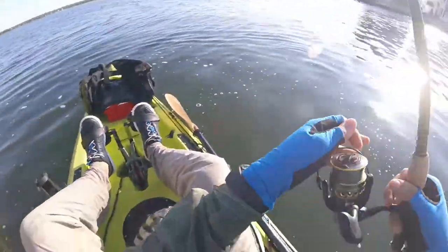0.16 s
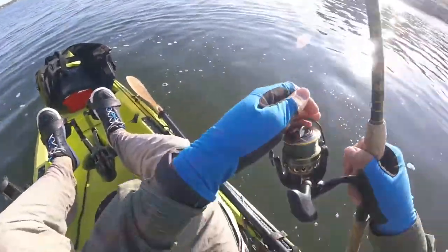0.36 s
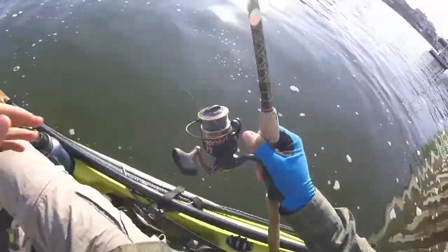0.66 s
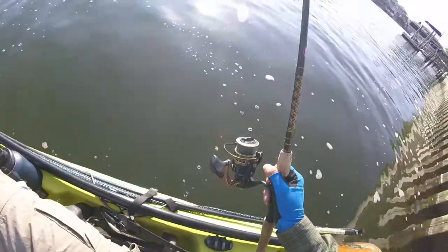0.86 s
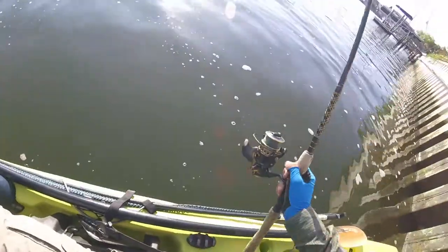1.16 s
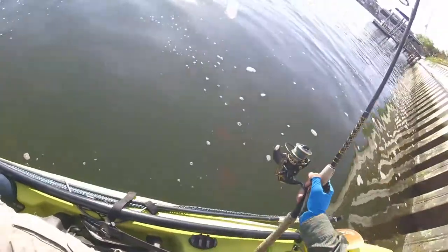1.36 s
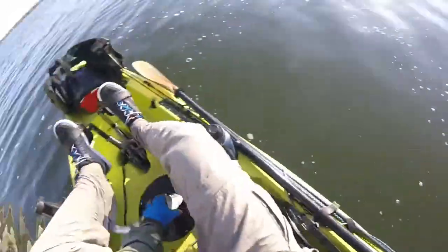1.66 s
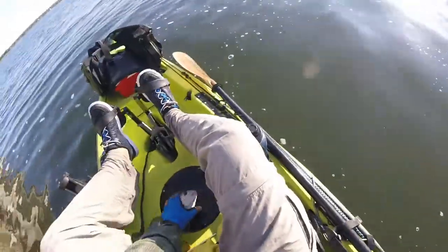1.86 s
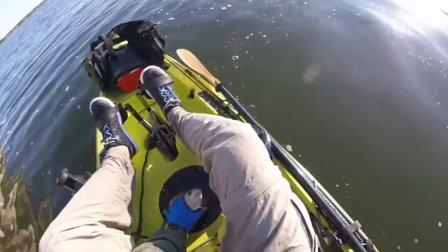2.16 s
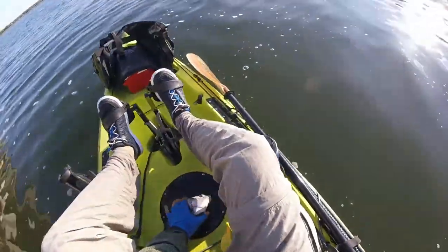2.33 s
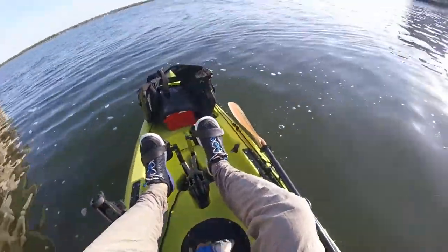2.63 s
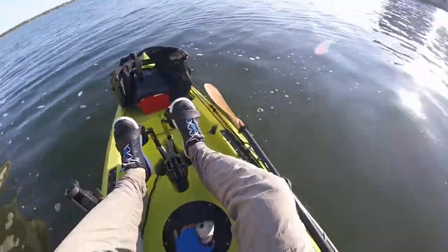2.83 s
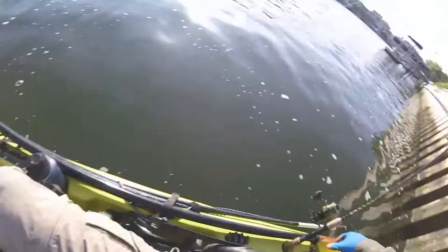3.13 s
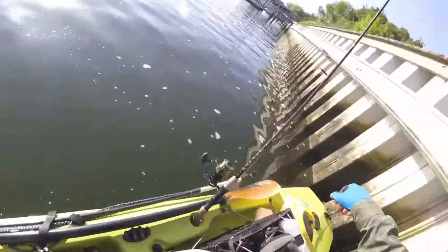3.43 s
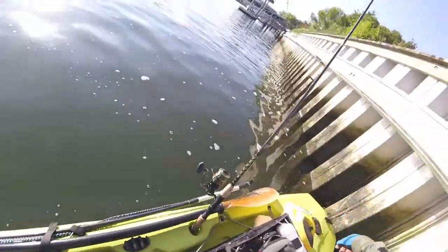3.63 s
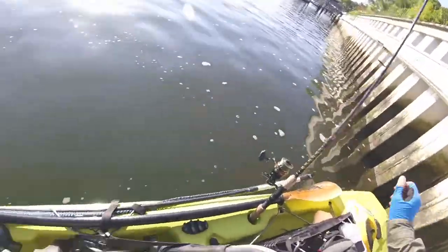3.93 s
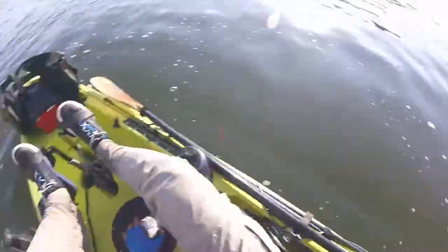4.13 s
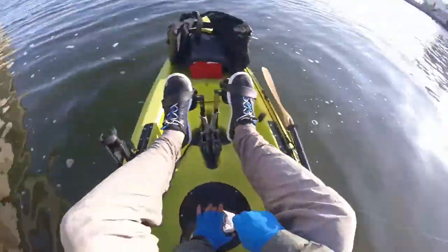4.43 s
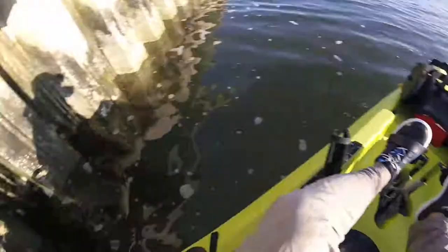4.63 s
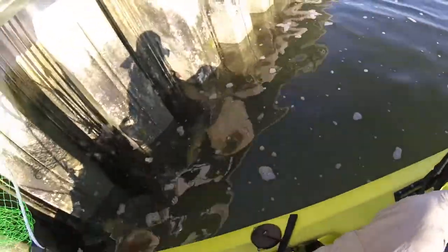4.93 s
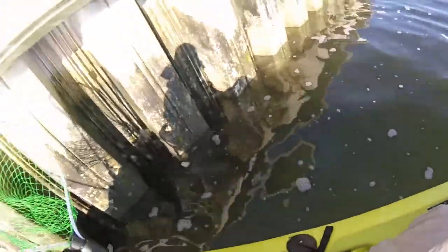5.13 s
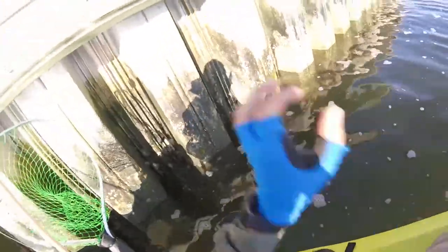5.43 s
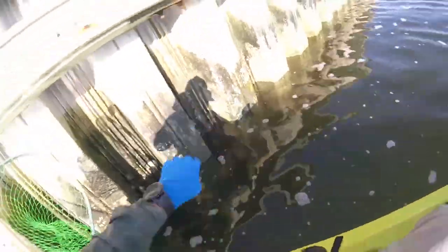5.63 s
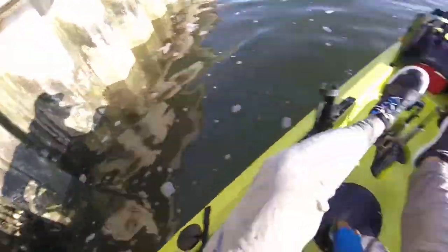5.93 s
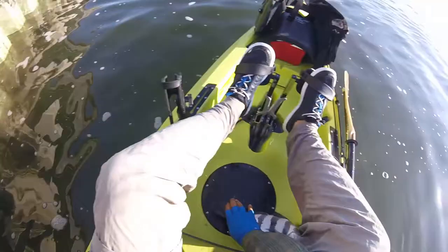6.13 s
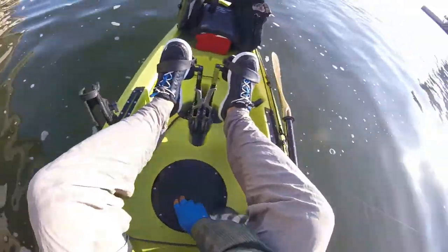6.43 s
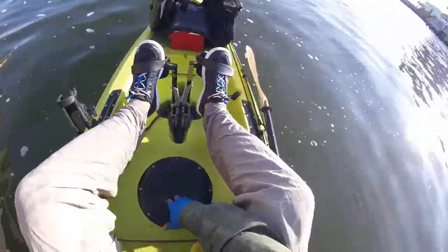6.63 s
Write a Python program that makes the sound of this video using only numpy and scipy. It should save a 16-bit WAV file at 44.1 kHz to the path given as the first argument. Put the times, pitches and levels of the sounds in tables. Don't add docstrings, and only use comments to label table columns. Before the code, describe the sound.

Close, boxy outdoor sound aboard a hollow plastic kayak. A ripple hisses, a reel bail clicks shut, then a fish beats the hatch about ten times a second, each low body thud answered by a wet tail smack. A lull brings soft housing knocks and a brief sleeve brush; heavier, more irregular flopping returns with wet drags, a faint seal groan and tiny metal tinkles. Light wind and distant chirps sit underneath.

```python
import sys
import numpy as np
from scipy import signal
from scipy.io import wavfile
from scipy.ndimage import uniform_filter1d, minimum_filter1d

SR = 44100
rng = np.random.default_rng(int(sys.argv[2]) if len(sys.argv) > 2 else 0)


def natural_amplitude(level_db):
    exponent = np.asarray(level_db, float) / 20
    return 10 ** exponent


def log_audio(samples):
    frames = np.atleast_2d(samples).T
    limited = np.clip(frames, -1, 1)
    pcm = np.round(limited * 32767).astype(np.int16)
    wavfile.write(sys.argv[1], SR, pcm)


N = 298998

# start [s], lid [dB], panels [dB], clap [dB].
FLANK = [(1.285, -35, -52, -59), (1.443, -31, -24, -56), (1.553, -16, -23, -36), (1.721, -14, -22, -50),
         (1.868, -23, -33, -53), (1.972, -16, -25, -31), (2.074, -13, -22, -32), (2.179, -18, -21, -33),
         (2.274, -14, -27, -33), (2.375, -13, -33, -29), (2.492, -17, -29, -39), (2.585, -19, -26, -23),
         (2.694, -16, -31, -39), (2.798, -16, -27, -32), (2.9505, -14, -28, -19), (3.065, -18, -36, -35),
         (3.241, -16, -18, -22), (3.4215, -15, -17, -28), (3.624, -20, -24, -44), (5.1365, -12, -17, -31),
         (5.323, -10, -15, -26), (5.468, -18, -24, -39), (5.6585, -13, -13, -24), (5.801, -18, -26, -44),
         (5.934, -25, -32, -51), (6.123, -36, -23, -53), (6.3505, -25, -18, -46), (6.4455, -25, -17, -32),
         (6.6385, -23, -20, -33)]
# start [s], lid [dB], panels [dB], clap [dB], spray [dB].
TAIL = [(0.863, -52, -34, -28, -45), (1.565, -26, -11, -21, -23), (1.772, -14, -8, -22, -25),
        (1.796, -18, -17, -30, -41), (1.9045, -21, -17, -4, -14), (2.0, -19, -21, -21, -23),
        (2.099, -15, -13, -16, -20), (2.198, -21, -11, -22, -22), (2.295, -18, -14, -20, -23),
        (2.3895, -18, -10, -13, -19), (2.509, -19, -17, -24, -33), (2.604, -11, -10, -31, -36),
        (2.7035, -7, -14, -15, -25), (2.809, -12, -14, -22, -32), (2.963, -5, -18, -13, -27),
        (3.085, -14, -11, -21, -24), (3.435, -27, -11, -16, -26), (3.6475, -34, -31, -42, -66),
        (5.162, -21, -16, -33, -35), (5.3525, -34, -15, -14, -28), (5.507, -14, -16, -17, -21),
        (5.8125, -17, -22, -28, -43), (6.1535, -20, -11, -45, -62), (6.464, -21, -33, -41, -42)]
# start [s], lid [dB], panels [dB].
REBOUNDS = [(0.8, -48, -64), (1.61, -40, -30), (2.134, -42, -29), (2.415, -32, -29), (2.651, -18, -31),
            (2.751, -38, -26), (2.852, -30, -34), (3.121, -38, -29), (3.281, -26, -38), (3.517, -39, -40),
            (3.673, -38, -34), (4.817, -47, -37), (4.958, -48, -42), (5.09, -56, -25), (5.188, -28, -37),
            (5.278, -50, -33), (5.564, -30, -34), (5.709, -32, -26), (5.779, -36, -38), (5.859, -37, -29),
            (5.955, -37, -37), (6.036, -37, -30), (6.064, -38, -29), (6.135, -28, -18), (6.228, -28, -41),
            (6.386, -35, -35), (6.663, -28, -23), (6.708, -40, -40)]
# start [s], clap [dB], spray
# [dB].
TICKS = [(0.4679, -48, -39), (0.502, -57, -40), (1.661, -34, -40), (1.6755, -38, -42), (1.6868, -33, -30),
         (2.116, -23, -34), (2.2057, -17, -20), (2.5436, -20, -27), (2.5942, -25, -33), (2.7752, -21, -22),
         (2.83, -34, -46), (3.03, -44, -52), (3.3543, -28, -39), (3.5296, -44, -49), (3.9278, -44, -54),
         (4.402, -50, -52), (4.5944, -44, -49), (4.6056, -49, -48), (5.0608, -35, -41), (5.4963, -20, -28),
         (5.5671, -27, -39), (5.9455, -38, -36), (6.0417, -43, -29), (6.1164, -36, -33), (6.5112, -24, -41),
         (6.5292, -47, -38), (6.6106, -29, -29), (6.689, -46, -43), (1.5545, -30, -38), (1.785, -30, -34),
         (1.845, -36, -38), (1.923, -36, -38), (2.0717, -40, -36), (2.2747, -40, -35), (2.375, -38, -33),
         (2.4912, -38, -33), (2.571, -40, -42), (3.0649, -42, -36), (3.7244, -62, -61), (3.795, -52, -62),
         (4.19, -62, -62), (4.635, -52, -56), (5.3193, -40, -40), (5.343, -40, -34), (5.4669, -45, -37),
         (5.7473, -52, -54), (5.7997, -40, -42), (5.8635, -50, -46), (5.9389, -42, -38), (6.2142, -52, -53),
         (6.31, -52, -55), (6.3514, -45, -42), (6.4183, -52, -50), (6.4462, -40, -36), (6.49, -42, -48),
         (6.6398, -44, -41)]
# start [s], clap [dB], spray [dB].
SMEARS = [(0.992, -57, -72), (1.6014, -43, -43), (1.7152, -40, -38), (1.8339, -35, -38), (1.8931, -34, -34),
          (1.9404, -41, -36), (2.628, -26, -45), (2.7513, -44, -44), (2.8999, -45, -45), (3.1148, -42, -41),
          (3.455, -37, -54), (3.6722, -44, -77), (3.695, -65, -58), (3.936, -56, -57), (4.6184, -49, -57),
          (4.693, -55, -61), (4.8, -50, -70), (4.8227, -47, -62), (4.956, -41, -55), (5.1919, -39, -46),
          (5.259, -33, -47), (5.2845, -28, -37), (5.3916, -38, -42), (5.8373, -40, -59), (6.0634, -49, -47),
          (2.995, -38, -50), (3.21, -46, -66), (3.3154, -47, -57), (3.548, -47, -66), (5.1167, -52, -56),
          (5.215, -42, -48), (6.72, -50, -55)]
# time [s], lid pitch [Hz], hull share [dB].
GRIP = [(0, 166, -12), (1.5, 138, -12), (2.5, 138, -8), (2.7, 145, -19), (3.1, 160.7, -6), (3.6, 161, -13),
        (5, 143.7, -7), (5.9, 136.8, -1), (6.22, 140, -21), (6.78, 153, -2)]
# frequency [Hz], level [dB], T60 [s].
PANEL_MODES = [(230, -1.5, 0.079), (285, -1, 0.077), (339.5, -3, 0.083), (430.8, -4, .08),
               (508.9, -5, 0.08), (647.5, -9, .07), (788, -13.5, 0.062), (935, -13, 0.059),
               (1180, -17, 0.045)]
# frequency [Hz], level [dB].
CLAP_COLOUR = [(300, -38), (600, 4), (1000, 3.5), (1500, -1.5), (2100, -3.5), (2800, -10), (4000, -45),
               (9000, -85)]
# frequency [Hz], level [dB].
SPRAY_COLOUR = [(1500, -41), (2600, -1), (4000, 2), (4800, -6), (6300, -7), (8000, -13), (10000, -25),
                (12000, -26), (14900, -52)]
# start [s], level [dB],
# frequency [Hz], T60 [s].
POPS = [(.864, -38, 1900, .02), (1.566, -24, 1000, .04), (1.905, -20, 2050, .015), (2.39, -24, 3750, .025),
        (2.39, -26, 1580, .03), (2.544, -33, 1100, .04), (2.704, -22, 720, .04), (2.773, -26, 3050, .025),
        (2.81, -28, 1550, .03), (2.962, -20, 720, .045), (3.086, -24, 600, .05), (3.435, -28, 2000, .03),
        (3.53, -44, 2900, .03), (5.354, -26, 1150, .04), (5.507, -26, 2200, .02), (5.507, -28, 3750, .025),
        (5.567, -34, 1400, .04), (5.612, -54, 2094, .2), (5.657, -14, 930, .028), (5.69, -33, 465, .25),
        (5.812, -28, 1100, .05), (6.042, -38, 3900, .018), (6.042, -40, 2750, .018), (6.06, -38, 581, .3),
        (6.117, -34, 4250, .014), (6.512, -36, 1950, .03), (6.512, -36, 1000, .03), (6.69, -48, 4000, .025),
        (5.392, -43, 1217, .5), (5.39, -50, 4740, .12), (3.11, -50, 4740, .08), (1.443, -20, 1180, .045),
        (1.45, -29, 940, .07), (5.985, -52, 2600, .1), (1.774, -17, 370, .06), (1.567, -19, 300, .05),
        (.864, -32, 430, .06), (5.36, -24, 520, .12), (6.465, -46, 3400, .03), (2.6, -26, 1750, .03)]
# frequency [Hz], T60 [s].
HOLLOW_DECAY = [(50, 0.27), (130, 0.22), (350, 0.22), (920, 0.19), (2400, 0.068), (6400, 0.078),
                (14000, 0.039)]
# frequency [Hz], level [dB].
RIM_COLOUR = [(150, -20), (350, -3), (600, 0), (1000, -3), (1600, -10), (2600, -20), (5000, -36),
              (9000, -60)]
# frequency [Hz], level [dB], T60 [s].
HOOK_MODES = [(1217, -3, .39), (2356, 0, .5), (3110, -10, .5), (3610, -19, .2), (4740, -14, .15)]
# frequency [Hz], level [dB], T60 [s].
SNAP_MODES = [(1580, 0, .3), (2885, 0, .35), (3880, -5, .35), (4060, -7, .3)]
# start [s], level [dB], time until damped [s], snap link [dB], swivel [dB].
SHAKES = [(1.47, -66, .05, -6, -12), (2.409, -50, .07, -12, -12), (2.75, -40, .085, -18, 1),
          (3.114, -54, .09, 3, -6), (3.47, -64, 0.089, -4, -9), (5.39, -38, 0.11, -19, -12),
          (5.61, -66, .045, 6, -3), (5.75, -60, .04, -10, -9), (6.064, -54, 0.055, 1, -6),
          (2.374, -55, .02, -9, 19), (6.528, -62, .015, -9, 20), (6.485, -62, .03, -9, 12)]
# frequency [Hz], level [dB], T60 [s].
BAIL_MODES = [(2110, 0, .008), (3000, -4, .006), (4150, -2, .007), (5450, -6, .007), (6300, -7, .008),
              (7900, -13, .005), (11500, -10, .0018)]
# frequency [Hz], level [dB], T60 [s].
BUTT_MODES = [(940, -6, .025), (1180, 0, .018), (2300, -4, .012), (3900, -4, .012), (8300, -9, .008),
              (10600, -9, .004)]
# start [s], bail [dB], butt [dB].
CLICKS = [
    (.4826, -24, -60),
    (.4846, -10, -45),
    (.488, -24, -50),
    (1.4408, -13, -28),
    (1.4432, -16, -13),
    (1.448, -19, -28),
]
# time of peak [s], peak [dB], frequency [Hz].
KNOCKS = [(.082, -25, 330), (.093, -33, 220), (.105, -38, 170), (.453, -33, 285), (.496, -33, 280),
          (3.7795, -32, 270), (3.808, -33, 275), (3.8435, -30, 270), (3.8845, -32, 275), (3.93, -38, 300),
          (4.0815, -31, 290), (4.1015, -30, 200), (4.107, -25, 80), (4.114, -30, 280), (4.151, -31, 290),
          (4.1775, -27, 85), (6.158, -12, 290), (6.175, -15, 270)]
# frequency [Hz], width [Hz], level [dB].
SEAL_TONES = [(490, 45, 0), (590, 60, -5), (1220, 70, -16)]
# frequency [Hz], level [dB].
SLEEVE_COLOUR = [(300, -12), (800, -6), (2000, 0), (3500, -2), (6000, -9), (10000, -22), (14000, -45)]
# start [s], length [s], first pitch [Hz], last pitch [Hz], level [dB].
BIRDS = [(.36, .035, 3450, 3980, -63), (.395, .023, 3950, 3455, -65), (.418, .018, 3455, 3950, -68),
         (1.065, .135, 3620, 2340, -68), (3.835, .035, 3820, 3500, -69), (4.2, .1, 2719, 2290, -66),
         (6.24, .05, 2650, 2370, -69), (6.385, .035, 4100, 2900, -59), (.26, .035, 2350, 2050, -70),
         (1.32, .035, 2950, 2850, -71), (3.935, .02, 3900, 3800, -64), (4.075, .02, 2800, 2950, -70),
         (4.105, .022, 3250, 3380, -66), (6.585, .02, 3100, 2600, -64), (.32, .016, 2350, 1750, -63),
         (.25, .08, 3650, 3750, -72), (1.415, .018, 3300, 3250, -62), (1.46, .08, 2550, 2300, -64),
         (1.345, .035, 2150, 1850, -70), (3.805, .028, 3400, 3900, -71), (4.345, .045, 2050, 2500, -70)]
# time [s], scuffing [dB], wind and hull rumble [dB].
STIR = [(0, -60, -52), (.53, -68, -53), (.8, -70, -47), (1.4, -64, -54), (1.9, -50, -41), (2.75, -51, -43),
        (3.2, -57, -45), (3.75, -65, -46), (4.38, -65, -52), (4.47, -55, -49), (4.62, -55, -49),
        (4.74, -63, -52), (5.02, -58, -48), (5.38, -47, -45), (5.7, -58, -43), (6.15, -56, -43),
        (6.28, -60, -46), (6.5, -54, -44)]
# frequency [Hz], level [dB].
AIR_COLOUR = [(3300, -9), (4700, -13), (5500, -8), (6400, 0), (8000, 0), (9500, -2), (11000, -13),
              (13000, -7), (14900, -8)]
# frequency [Hz], level [dB].
FIZZ_COLOUR = [(8000, -40), (9400, -4), (10200, -5), (11500, -2), (12600, -2), (13800, -6), (14700, -18)]
# frequency [Hz], level [dB].
SCUFF_COLOUR = [(150, -4), (300, 6.5), (600, 0), (1000, -5), (2000, -7), (3800, -11), (7500, -26),
                (12500, -60)]
# frequency [Hz], level [dB].
WIND_COLOUR = [(12, -8), (32, 5), (60, -9), (120, -22), (250, -33), (500, -37), (1200, -78)]

LID_T60_S, HULL_HZ, HULL_T60_S, DECK_TO_HULL_DB = .058, 56, .14, -3
SLAP_T60_S, HARD_DB, SHORTER_PER_DB = .027, -20, .03
FLANK_SPRAY_DB, FRESH_S, DRYING_DB_PER_S, TIRING_PER_S = -7.5, 2, -1.6, .13
TICK_T60_S, SMEAR_T60_S, SMEAR_HOLD = .021, .058, 1.7
SLAP_PATCHES_DB, AIR_PATCHES_DB = 1.5, .7
HOLLOW_DB = -12
RIM_DB, RIM_T60_S, RIM_RISE_S = -18, .16, .008
SWIVEL_HZ, SWIVEL_T60_S = 6430, .05
SEAL_S, SEAL_SPREAD_S, SEAL_DB = 5.55, .45, -40.5
SLEEVE_S, SLEEVE_SPREAD_S, SLEEVE_DB = 4.53, .09, -59
GLIDE_S = .018
AIR_DB, AIR_PER_STIR, FIZZ_HZ, FIZZ_DB = -66.3, .2, 9600, -77
EARLY_HISS_DB, EARLY_HISS_END_S = 3.5, .47
PORT_HZ, PORT_WIDTH_HZ, PORT_DB, ROLL_OFF_HZ = 6450, 300, 7, 13800
THIN_FROM_HZ, EDGE_HZ, EDGE_SPREAD_HZ, KEEP_DB, OPEN_DB = 9500, 13800, 500, 2, 9


def read(points, hz):
    f, value = np.transpose(points)
    return np.interp(np.log(hz + 1), np.log(f + 1), value)


def add(mix, start_s, sound):
    part = mix[round(start_s * SR):][:len(sound)]
    part += sound[:len(part)]


def hiss(colour, patchy_db):
    frames, hz = N // 128 + 9, np.fft.rfftfreq(512, 1 / SR)
    real, imag, patches = rng.standard_normal((frames, 257, 3)).T
    patches = uniform_filter1d(uniform_filter1d(patches, size=6, axis=0), size=10, axis=1)
    level_db = read(colour, hz)[:, None] + patchy_db * patches / patches.std()
    x = signal.istft((real + 1j * imag) * natural_amplitude(level_db), nperseg=512, noverlap=384)[1][512:][:N]
    return x / x.std()


def grains(*sizes):
    x = rng.standard_normal(N)
    for size in sizes:
        x = uniform_filter1d(x, size=size)
    return x / x.std()


def bell(centre_s, spread_s):
    return np.exp(-((np.arange(N) / SR - centre_s) / spread_s) ** 2)


def ring(t, hz, t60_s, rise_s, phase, smother=1):
    worn = (t + 1 / SR) / t60_s
    tone = np.sqrt(2) * np.sin(2 * np.pi * hz * t + phase)
    return tone * natural_amplitude(-60 * worn ** smother) * (1 - np.exp(-t / rise_s))


def blows():
    return [row[:3] for row in FLANK + TAIL + REBOUNDS]


def contacts():
    flops = [(s, db, db + FLANK_SPRAY_DB + DRYING_DB_PER_S * (s - FRESH_S)) for s, _, _, db in FLANK]
    flops += [(s, db, spray_db) for s, _, _, db, spray_db in TAIL]
    rows = []
    for s, db, spray_db in flops:
        longer = SHORTER_PER_DB * (HARD_DB - db) + TIRING_PER_S * (s - FRESH_S)
        rows.append((s, db, spray_db, SLAP_T60_S * np.exp(longer), 1))
    rows += [(*row, TICK_T60_S, 1) for row in TICKS]
    rows += [(s, db - 4.5, spray_db - 4, SMEAR_T60_S, SMEAR_HOLD) for s, db, spray_db in SMEARS]
    return rows


def thuds():
    out, t = np.zeros(N), np.arange(SR // 7) / SR
    hz, db, t60_s = np.transpose(PANEL_MODES)[:, :, None]
    grip_s, grip_hz, grip_db = np.transpose(GRIP)
    chance = rng.standard_normal((len(blows()), 3, len(PANEL_MODES), 1))
    for (s, lid_db, panel_db), (spot, detune, phase) in zip(blows(), chance):
        lid_hz = np.interp(s, grip_s, grip_hz)
        share_db = np.interp(s, grip_s, grip_db)
        hull_db = share_db + 20 * np.log10(np.hypot(natural_amplitude(lid_db), natural_amplitude(panel_db + DECK_TO_HULL_DB)))
        lid = ring(t, lid_hz, LID_T60_S, .0031, 2.17, smother=1.6)
        hull = ring(t, HULL_HZ * (1 + .056 * detune[0]), HULL_T60_S, .0069, .5, smother=1.4)
        modes = ring(t, hz * (1 + .05 * detune), t60_s, .0016, 3 * phase, smother=1.2)
        panels = (natural_amplitude(db + 2.5 * spot) * modes).sum(0)
        add(out, s - .002, natural_amplitude(lid_db + 1.5) * lid + natural_amplitude(hull_db + 1.6) * hull + natural_amplitude(panel_db - 6) * panels)
    return out


def slaps():
    clap, spray, t = np.zeros(N), np.zeros(N), np.arange(SR // 10) / SR
    for s, clap_db, spray_db, t60_s, hold in contacts():
        t60_s = np.clip(t60_s, .004, .07)
        clap_fall_db = -60 * (t / (1.177 * t60_s)) ** hold
        spray_fall_db = -60 * (t / (1.037 * t60_s)) ** hold
        add(clap, s - .0015, natural_amplitude(clap_db + 4 + clap_fall_db) * (1 - np.exp(-t / .0012)) ** 2)
        add(spray, s - .0015, natural_amplitude(spray_db + 4 + spray_fall_db) * (1 - np.exp(-t / .0011)) ** 2)
    grit = natural_amplitude(3.6 * grains(22, 15))
    return grit * (clap * hiss(CLAP_COLOUR, SLAP_PATCHES_DB) + spray * hiss(SPRAY_COLOUR, SLAP_PATCHES_DB))


def pops():
    out, t = np.zeros(N), np.arange(SR // 12) / SR
    fade = np.cos(np.pi / 2 * t / t[-1])
    for s, db, hz, t60_s in POPS:
        add(out, s, natural_amplitude(db) * ring(t, hz, t60_s, .001, 0, smother=1.3) * fade)
    return out


def hollow(x):
    taps = rng.choice([-1., 1.], (3, SR // 2)) * (rng.random((3, SR // 2)) < 1 / 20)
    hz, t, z = signal.stft(taps, SR, nperseg=512)
    decay = natural_amplitude(-60 * t / read(HOLLOW_DECAY, hz)[:, None])
    tails = signal.istft(z * decay, SR, nperseg=512)[1]
    turn = 2 * np.pi * (np.arange(N) / SR * 3.1 + np.arange(3)[:, None] / 3)
    return signal.fftconvolve(x * np.cos(turn), tails / np.linalg.norm(tails[0]), axes=1).sum(0)[:N]


def shudder():
    level, t = np.zeros(N), np.arange(SR // 5) / SR
    for s, _, panel_db in blows():
        add(level, s, natural_amplitude(panel_db + RIM_DB - 60 * t / RIM_T60_S) * (1 - np.exp(-t / RIM_RISE_S)))
    return level * natural_amplitude(3.5 * grains(90, 60)) * hiss(RIM_COLOUR, patchy_db=2.5)


def hook():
    out = np.zeros(N)
    chance = rng.standard_normal((len(SHAKES), len(HOOK_MODES + SNAP_MODES) + 1, 2))
    for (s, shake_db, length_s, snap_db, swivel_db), spots in zip(SHAKES, chance):
        t = np.arange(0, length_s, 1 / SR)
        modes = HOOK_MODES + [(hz, db + snap_db, t60_s) for hz, db, t60_s in SNAP_MODES]
        modes = modes + [(SWIVEL_HZ, swivel_db, SWIVEL_T60_S)]
        lines = np.zeros(len(t))
        for (hz, db, t60_s), (spot, phase) in zip(modes, spots):
            beat = 1 + .25 * np.sin(2 * np.pi * (18 + 6 * spot) * t + 5 * phase)
            lines += natural_amplitude(db + 1.2 * spot) * ring(t, hz, t60_s, .0026, 3 * phase) * beat
        add(out, s, natural_amplitude(shake_db) * lines * np.minimum((length_s - t) / .015, 1))
    return out


def reel():
    out, t = np.zeros(N), np.arange(SR // 10) / SR
    phases = 2 * np.pi * rng.random((len(CLICKS), len(BAIL_MODES)))
    for (s, bail_db, butt_db), phase in zip(CLICKS, phases):
        bail = sum(natural_amplitude(db) * ring(t, hz, t60_s, .0002, p) for (hz, db, t60_s), p in zip(BAIL_MODES, phase))
        butt = sum(natural_amplitude(db) * ring(t, hz, t60_s, .0003, p) for (hz, db, t60_s), p in zip(BUTT_MODES, phase))
        add(out, s, natural_amplitude(bail_db) * bail + natural_amplitude(butt_db) * butt)
    return out


def knocks():
    out, t = np.zeros(N), np.arange(-SR // 50, SR // 50) / SR
    for s, db, hz in KNOCKS:
        inward = -1 if hz > 150 else 1
        base = np.cos(2 * np.pi * hz * t) * np.exp(-(t * hz / .8) ** 2)
        overtone = natural_amplitude(-8) * np.sin(2 * np.pi * 1.9 * hz * t) * np.exp(-((t + .002) * hz / .5) ** 2)
        swing = natural_amplitude(db) * inward * (base + overtone)
        add(out, s + t[0], swing)
        add(out, s + t[0] + .007, natural_amplitude(-9) * swing)
    return out


def groan():
    rub = rng.standard_normal(N)
    tones = sum(natural_amplitude(db) * signal.lfilter(*signal.iirpeak(hz, hz / width_hz, SR), rub)
                for hz, width_hz, db in SEAL_TONES)
    return natural_amplitude(SEAL_DB) * bell(SEAL_S, SEAL_SPREAD_S) * tones / tones.std()


def sleeve():
    return natural_amplitude(SLEEVE_DB) * bell(SLEEVE_S, SLEEVE_SPREAD_S) * hiss(SLEEVE_COLOUR, patchy_db=2.5)


def birds():
    out = np.zeros(N)
    for s, length_s, first_hz, last_hz, db in BIRDS:
        t = np.arange(0, length_s, 1 / SR)
        end = np.exp(-length_s / GLIDE_S)
        left = (np.exp(-t / GLIDE_S) - end) / (1 - end)
        pitch_hz = last_hz + (first_hz - last_hz) * left
        tone = np.sqrt(2) * np.sin(2 * np.pi * np.cumsum(pitch_hz) / SR)
        add(out, s, natural_amplitude(db - 2.5) * tone * signal.windows.tukey(len(t), .2))
    return out


def background():
    s, *levels = np.transpose(STIR)
    t = np.arange(N) / SR
    scuff_db, wind_db = (np.interp(t, s, db) for db in levels)
    stir_db = scuff_db + 60
    early = np.clip((EARLY_HISS_END_S - t) / .06 + .5, 0, 1)
    air_db = AIR_DB + AIR_PER_STIR * stir_db + EARLY_HISS_DB * early
    tugs_db = .4 * np.maximum(stir_db, 0) * grains(600)
    low_pass = signal.butter(4, FIZZ_HZ, fs=SR, output="sos")
    near = signal.sosfiltfilt(low_pass, hiss(AIR_COLOUR, AIR_PATCHES_DB))
    air = natural_amplitude(air_db - 1.5 + .6 * tugs_db) * near
    fizz = natural_amplitude(FIZZ_DB + 8 * early + .35 * stir_db) * hiss(FIZZ_COLOUR, patchy_db=3)
    scuff = natural_amplitude(scuff_db + tugs_db + 4.5) * hiss(SCUFF_COLOUR, patchy_db=2.6)
    wind = natural_amplitude(wind_db + .2) * hiss(WIND_COLOUR, patchy_db=2.2)
    return air + fizz + scuff + wind


def scene():
    hits = thuds() + slaps() + reel() + pops()
    handling = shudder() + hook() + knocks() + groan() + sleeve()
    return (hits + natural_amplitude(HOLLOW_DB) * hollow(hits) + handling + birds() + background())[None]


def thin(x):
    hz, _, z = signal.stft(x, SR, nperseg=2048, noverlap=1536)
    top, held, bins = hz > THIN_FROM_HZ, np.arange(z.shape[1]) // 5, np.arange(len(hz))
    chance = rng.standard_normal((held[-1] + 1, len(hz)))[held].T
    strips = chance[bins // 3] > -.4
    patches = chance[bins // 14 + 400] > -1.45
    power = abs(z[top]).mean(0)
    hit = power > natural_amplitude(OPEN_DB) * minimum_filter1d(power, size=9)
    loud = power > 2 * natural_amplitude(OPEN_DB) * np.median(power)
    edge_hz = EDGE_HZ + EDGE_SPREAD_HZ * np.clip(chance[0], -3, 1.7) + 3000 * loud
    gain = np.where(~top[:, None] | hit, 1, natural_amplitude(KEEP_DB) * (strips & patches))
    keep = gain * (hz[:, None] < edge_hz)
    return signal.istft(z * keep, SR, nperseg=2048, noverlap=1536)[1][:N]


def top_cut(x):
    return signal.sosfilt(signal.butter(12, 15020, fs=SR, output="sos"), x)


def record(dry):
    rounded = 1.3 * np.tanh(dry / 1.3)
    port = signal.lfilter(*signal.iirpeak(PORT_HZ, PORT_HZ / PORT_WIDTH_HZ, SR), rounded)
    roll_off = signal.firwin(41, ROLL_OFF_HZ, fs=SR)[None]
    heard = signal.oaconvolve(rounded + natural_amplitude(PORT_DB) * port, roll_off, "same")
    return top_cut(thin(heard[0])[None])


dry = scene()
out = record(dry)
log_audio(out)
```